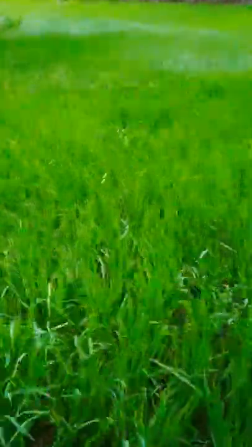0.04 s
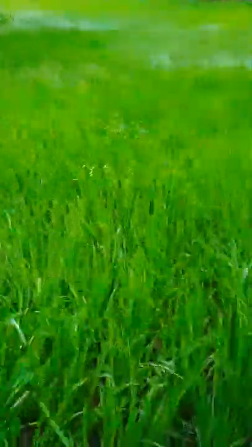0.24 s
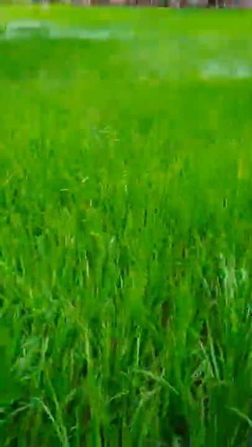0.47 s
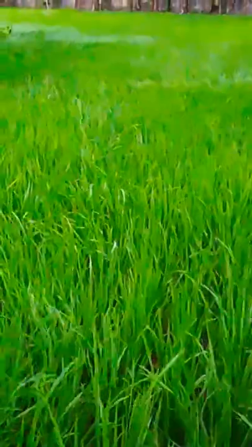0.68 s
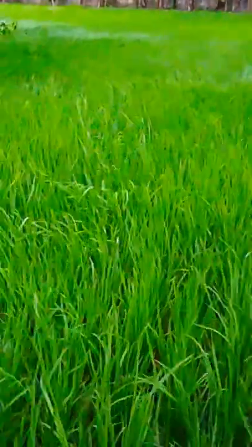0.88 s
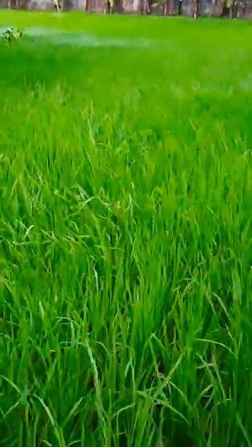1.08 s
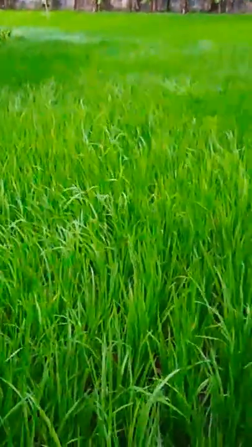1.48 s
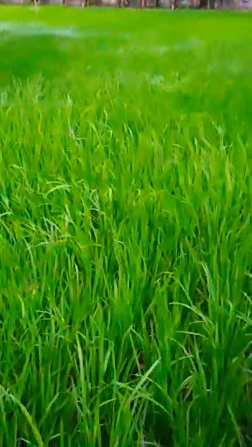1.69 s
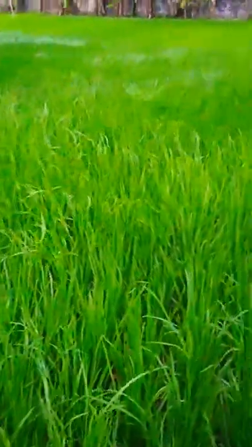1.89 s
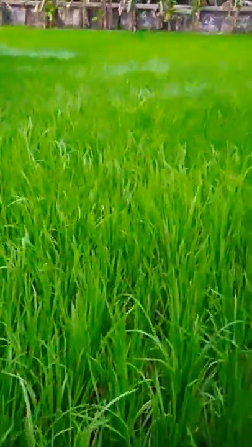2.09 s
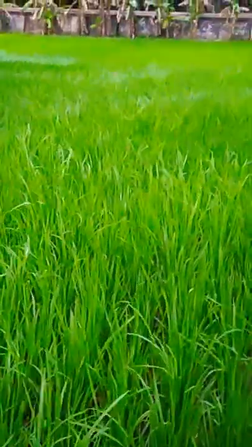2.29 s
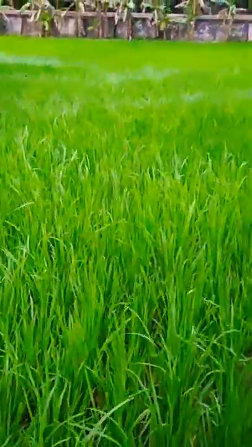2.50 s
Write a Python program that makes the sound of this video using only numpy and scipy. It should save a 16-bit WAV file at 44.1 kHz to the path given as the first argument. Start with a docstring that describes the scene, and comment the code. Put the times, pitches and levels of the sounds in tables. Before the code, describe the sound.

Wind rustles through a dense rice field as a steady hiss with tiny leaf ticks. Early on, a gust buffets the microphone with low thumps. The hiss eases slightly, and a much weaker gust follows near the end.

```python
"""A dense rice field in wind. Countless leaves brush each other and merge into a steady hiss that
slowly eases; the nearest blades add tiny ticks. One gust buffets the microphone early on, its
eddies thumping as they pass. A much weaker one follows near the end."""
import sys
import numpy as np
from scipy.fft import rfft, irfft
from scipy.io import wavfile
from scipy.ndimage import uniform_filter1d

SR = 44100
rng = np.random.default_rng(int(sys.argv[2]) if len(sys.argv) > 2 else 0)


def int16_out(signal):
    """Quantize to a 16-bit WAV file."""
    q = np.round(np.clip(np.atleast_2d(signal).T, -1, 1) * 32767)
    wavfile.write(sys.argv[1], SR, q.astype(np.int16))


N = 116865

# wind in the plants (time [s], hiss level [dB])
RUSTLE_LEVEL = [(0, -35), (.45, -35), (.9, -36.5), (1.4, -37), (1.9, -37.5), (2.3, -37.5), (2.65, -37)]
# field hiss up to about 8 kHz; higher points shape a faint treble floor
# (frequency [Hz], relative density [dB])
HISS_SPECTRUM = [(60, 2), (150, 5.5), (300, 2.5), (480, 0.5), (700, -0.5), (1000, -2), (1350, -4),
                 (1750, -2), (2100, -0.05), (2500, -1.3), (3200, -4), (4200, -5), (5500, -5.5), (7500, -5),
                 (11300, -4.5), (12500, -16.5), (15000, -16), (17000, -39)]
# nearby leaf ticks (frequency [Hz], relative density [dB])
LEAF_SPECTRUM = [(600, -27), (1500, -10.5), (2300, -0.5), (3500, -5), (7500, -12), (11000, -36),
                 (17000, -42.5)]
# wind at the microphone (time [s], buffeting level before brightening [dB])
GUST_LEVEL = [(0, -31), (.18, -36.5), (.235, -23), (.30, -28), (.37, -24), (.415, -20), (.47, -30.5),
              (.51, -22), (.58, -20), (.64, -20), (.70, -24.5), (.76, -26.5), (.80, -32), (1.0, -38.5),
              (1.4, -41.5), (2.02, -38.5), (2.08, -35), (2.18, -33), (2.27, -34.5), (2.39, -37.5),
              (2.5, -36), (2.65, -34)]
# buffeting at BUFFET_REF_DB (frequency [Hz], relative density [dB])
BUFFET_SPECTRUM = [(8, -5.5), (20, -1), (38, 2), (65, -5), (115, -8.5), (225, -14), (300, -20.5),
                   (500, -35), (800, -47), (1500, -61), (8000, -110)]
# eddies hitting the microphone (time [s], push level [dB], time scale [ms], wake level [dB])
EDDY_HITS = [(0.23, -28, 1.3, -31), (.311, -14.5, 0.77, -29), (0.338, -15, 2.3, -47),
             (0.359, -16, 4.3, -45), (.393, -2, 1.12, -22.5), (.409, -12, 1.13, -25),
             (0.429, -1.5, 1.93, -29), (0.458, -14, 0.7, -33), (0.495, -2, 2.8, -42),
             (0.504, -15.5, 0.91, -31), (.527, -13, 3.2, -47.5), (0.551, -10.5, 0.56, -27.5),
             (.565, -17.5, 1.1, -41), (0.615, -12.5, 1, -36), (0.638, -7, 2.2, -41), (0.665, -13, 1.1, -37),
             (0.753, -10, 1.93, -43), (2.07, -24, 3.3, -56), (2.141, -23.5, 7.7, -45),
             (2.375, -22, 8.9, -54)]
# wake of an eddy (frequency [Hz], relative density [dB])
WAKE_SPECTRUM = [(40, -10), (120, -3), (230, 3), (330, 0), (520, -6.5), (750, -17.5), (1100, -24),
                 (2500, -48), (8000, -104)]

SWAY_DB, SWAY_HZ, FLICKER_DB, FLICKER_HZ = 0.3, 8.4, 0.5, 17
LEAF_TICKS_PER_S, LEAF_SCATTER_DB, LEAF_RE_HISS_DB = 3000, 2.5, -5.5
BUFFET_REF_DB, BUFFET_KNEE_HZ = -25, 60
BRIGHTEN_PER_OCT, BRIGHTEN_SPAN_OCT = 0.33, 1.5
FLUTTER_DB, FLUTTER_HZ = 2.5, 60.5
SUCTION_DEPTH, SUCTION_LENGTH = 0.55, 2.1  # ratios to the push
WAKE_RISE_S, WAKE_DECAY_S = 0.003, 0.013
ROLL_OFF_HZ, STOP_HZ, STOP_DB = 7194, 8306, -37


def undb(db):
    """Decibels to gain."""
    return 10 ** (np.asarray(db) / 20)


def unit_rms(x):
    """Scale to rms 1."""
    return x / np.sqrt(np.mean(x ** 2))


def envelope(rows):
    """Join (time [s], value) rows by straight lines."""
    return np.interp(np.arange(N) / SR, *np.array(rows).T)


def wander(rate_hz):
    """Random steps at rate_hz, smoothed twice; rms 1."""
    hold = max(int(SR / rate_hz), 1)
    steps = rng.standard_normal(4096)[np.arange(N) // hold % 4096]
    return unit_rms(uniform_filter1d(uniform_filter1d(steps, hold), hold))


def bin_octaves():
    """FFT bin frequencies in octaves above 1 Hz."""
    return np.log2(np.maximum(np.arange(N // 2 + 1) * SR / N, 1))


def colour(x, points):
    """Filter by (frequency [Hz], level [dB]) points; rms 1."""
    hz, db = np.array(points).T
    gain = undb(np.interp(bin_octaves(), np.log2(hz), db))
    return unit_rms(irfft(rfft(x) * gain, N))


def octave_bands(x):
    """Yield overlapping (centre [Hz], band) pairs; the bands sum to x."""
    spectrum, bins_oct, centres_oct = rfft(x), bin_octaves(), np.arange(5, 14)
    for centre in centres_oct:
        weight = np.interp(bins_oct, centres_oct, 1. * (centres_oct == centre))
        yield 2. ** centre, irfft(spectrum * weight, N)


def field_hiss():
    """Distant leaves merge into a hiss up to about 8 kHz; its bands sway together and flicker alone."""
    hiss = colour(rng.standard_normal(N), HISS_SPECTRUM)
    sway_db = SWAY_DB * wander(SWAY_HZ)
    return sum(band * undb(sway_db + FLICKER_DB * wander(FLICKER_HZ)) for _, band in octave_bands(hiss))


def leaf_ticks():
    """The nearest blades touch in dense, tiny ticks of uneven size."""
    touches = rng.random(N) < LEAF_TICKS_PER_S / SR
    signs = np.sign(rng.standard_normal(N))
    sizes = undb(LEAF_SCATTER_DB * np.clip(rng.standard_normal(N), -2, 2))
    return undb(LEAF_RE_HISS_DB) * colour(touches * signs * sizes, LEAF_SPECTRUM)


def buffeting():
    """Turbulence on the microphone: louder and brighter in stronger wind; the upper bands flutter."""
    gust_db = envelope(GUST_LEVEL)
    flutter_db = FLUTTER_DB * np.clip(wander(FLUTTER_HZ), -2, 2)
    rumble = colour(rng.standard_normal(N), BUFFET_SPECTRUM)
    out = np.zeros(N)
    for hz, band in octave_bands(rumble):
        above_oct = np.clip(np.log2(hz / BUFFET_KNEE_HZ), 0, BRIGHTEN_SPAN_OCT)
        brighten_db = BRIGHTEN_PER_OCT * above_oct * (gust_db - BUFFET_REF_DB)
        out += band * undb(gust_db + brighten_db + min(above_oct, 1) * flutter_db)
    return out


def bump(u):
    """Rounded pulse, height 1 at u = 0."""
    return 1 / (1 + u ** 2) ** 2


def eddies():
    """Each eddy: a pressure push, then a longer, shallower suction, with a brief rough wake."""
    time_s = np.arange(N) / SR
    wake = colour(rng.standard_normal(N), WAKE_SPECTRUM)
    out = np.zeros(N)
    for hit_s, push_db, scale_ms, wake_db in EDDY_HITS:
        age_s = time_s - hit_s
        u = age_s * 1000 / (2 * scale_ms)
        push = bump(u + 0.5)
        suction = SUCTION_DEPTH * bump((u - 1) / SUCTION_LENGTH)
        wake_gain = undb(wake_db) * np.exp(np.minimum(age_s / WAKE_RISE_S, -age_s / WAKE_DECAY_S))
        out += undb(push_db) * (push - suction) + wake_gain * wake
    return out


def scene():
    """Rustling field plus wind on the microphone; mono."""
    rustle = undb(envelope(RUSTLE_LEVEL)) * (field_hiss() + leaf_ticks())
    return (rustle + buffeting() + eddies())[None]


def record(dry):
    """Steep treble cut down to a floor of STOP_DB."""
    hz = np.arange(N // 2 + 1) * SR / N
    gain = np.interp(hz, [ROLL_OFF_HZ, STOP_HZ], [1, 0])
    return irfft(rfft(dry) * np.maximum(gain, undb(STOP_DB)), N)


dry = scene()
out = record(dry)
int16_out(out)
```